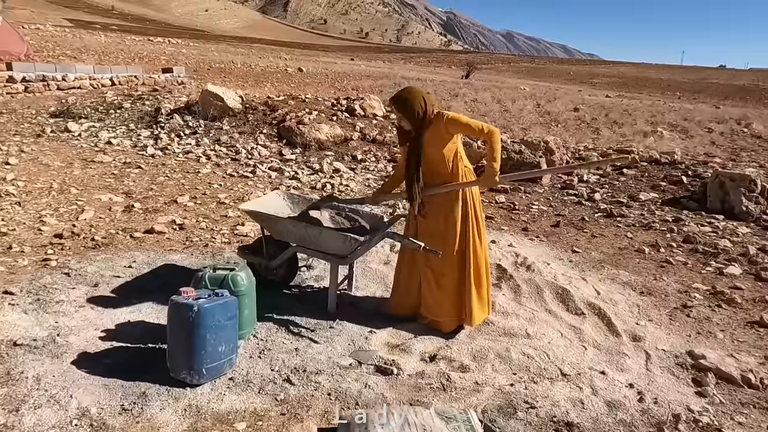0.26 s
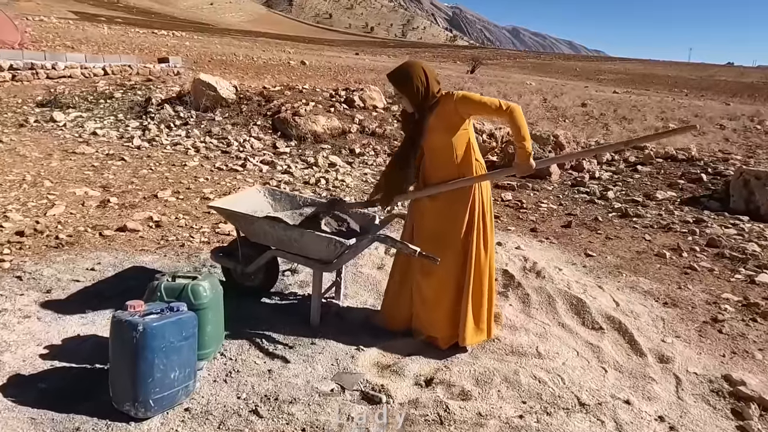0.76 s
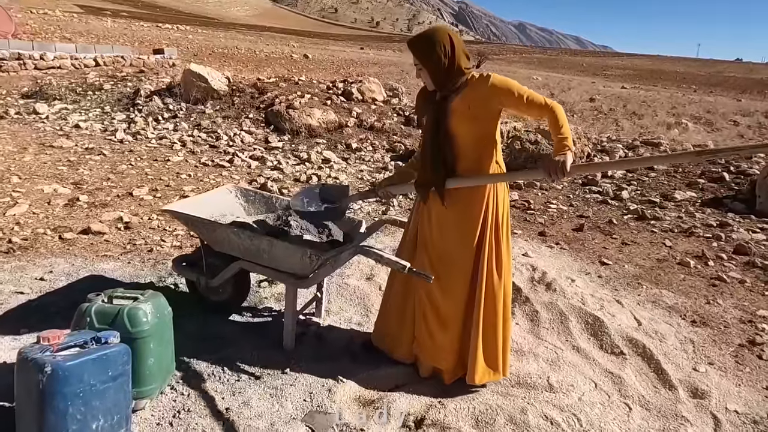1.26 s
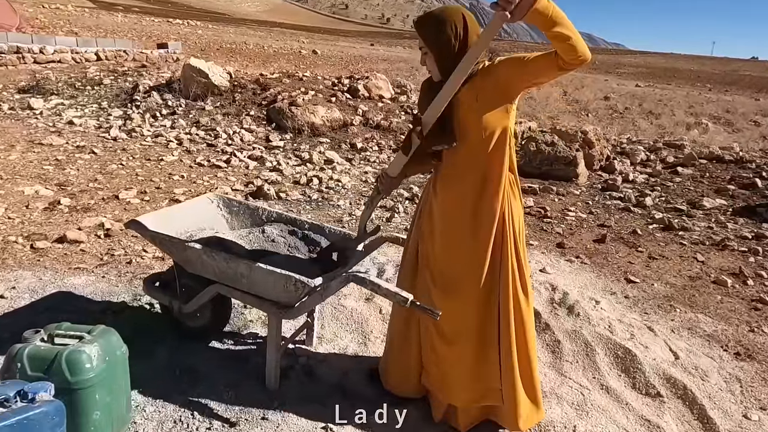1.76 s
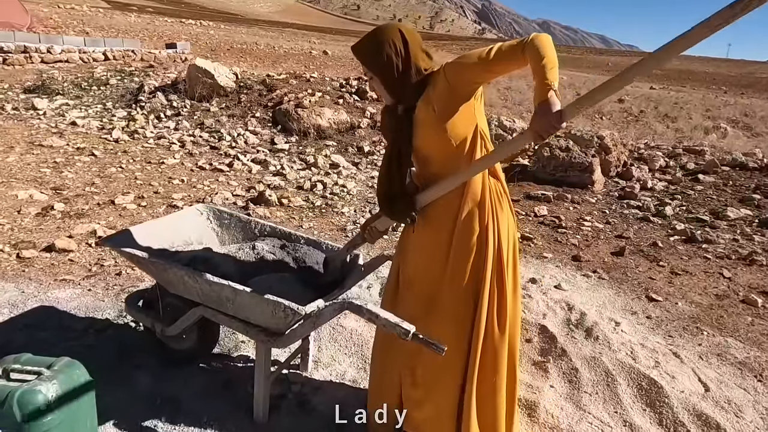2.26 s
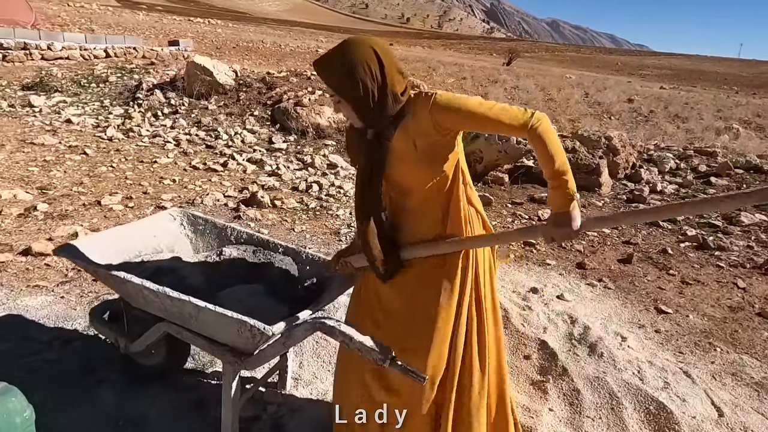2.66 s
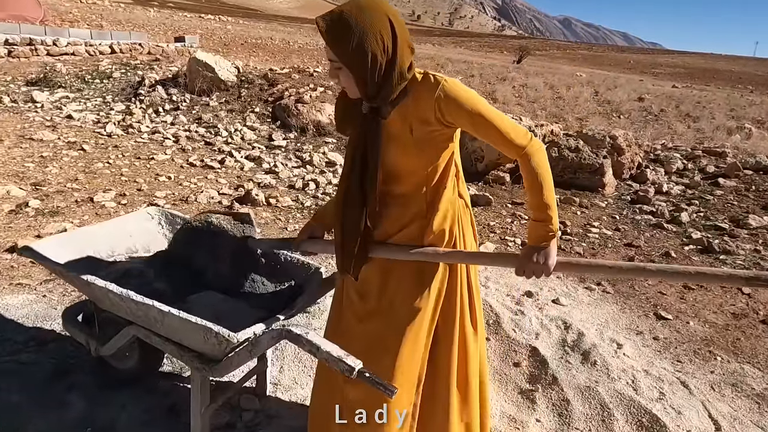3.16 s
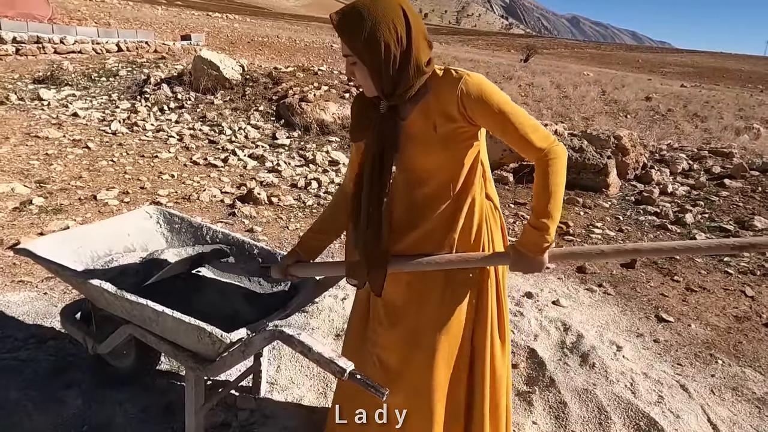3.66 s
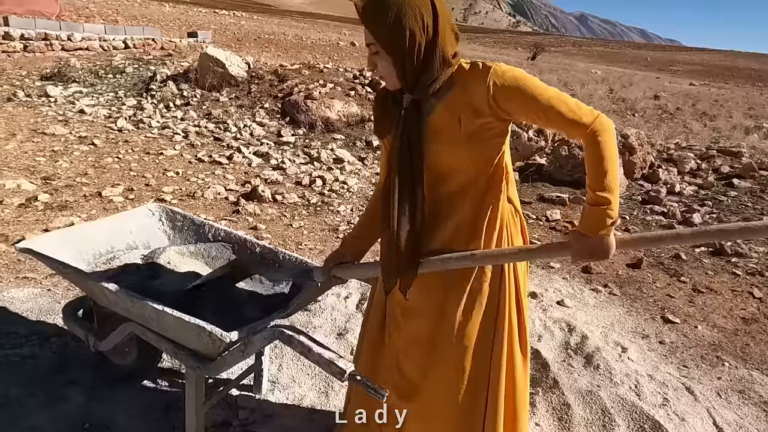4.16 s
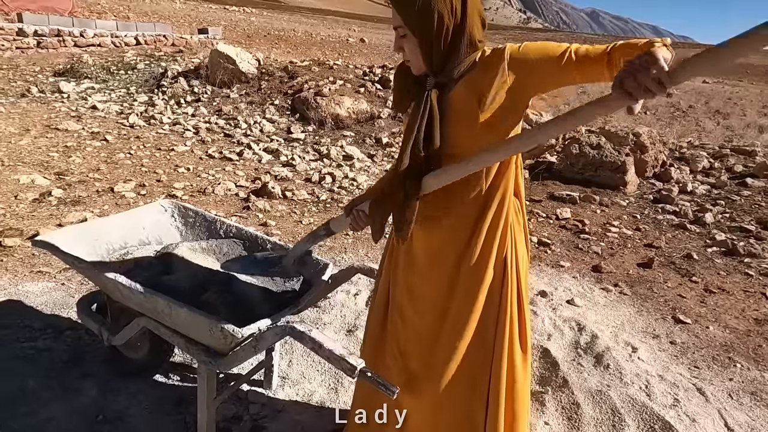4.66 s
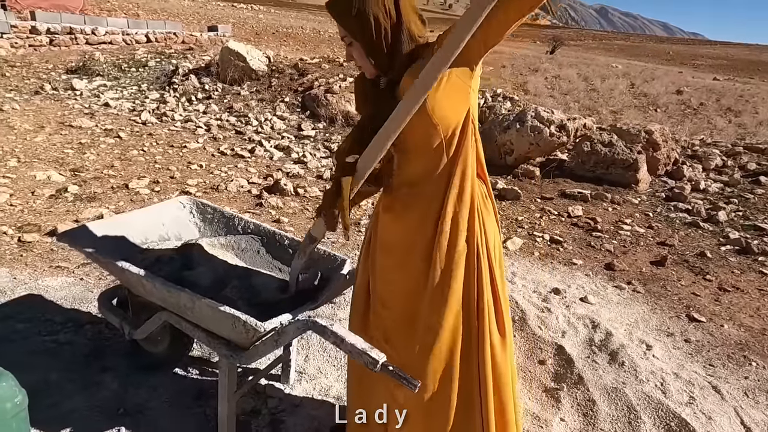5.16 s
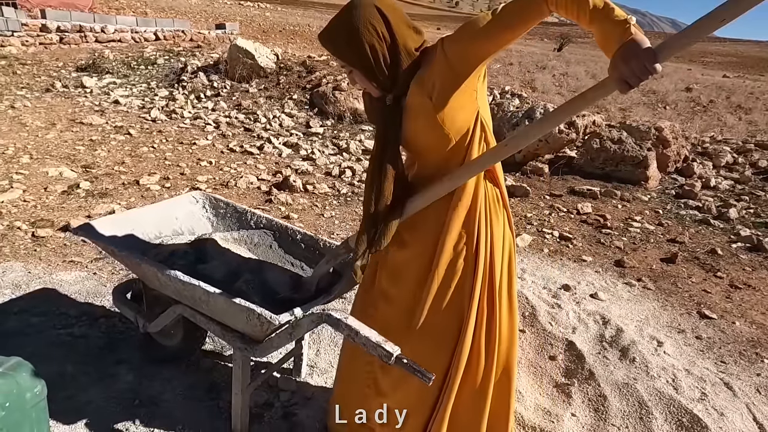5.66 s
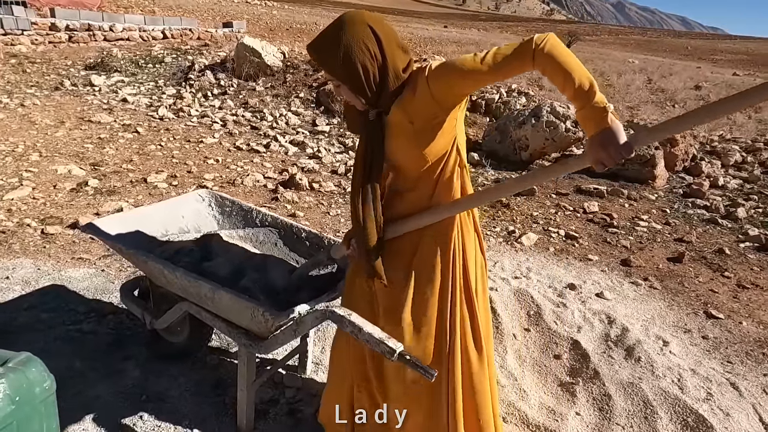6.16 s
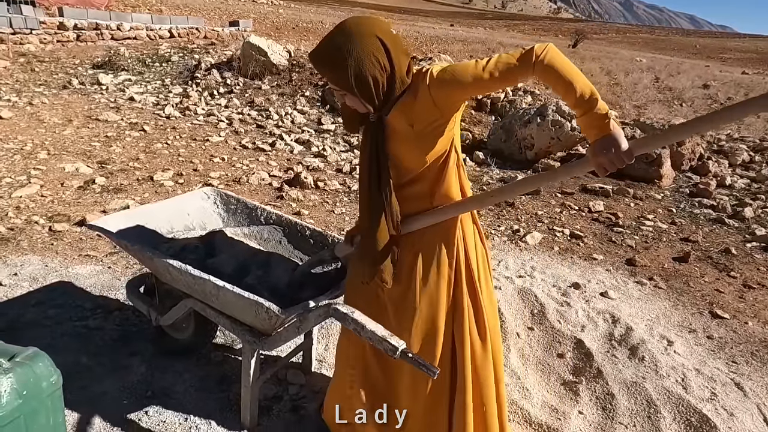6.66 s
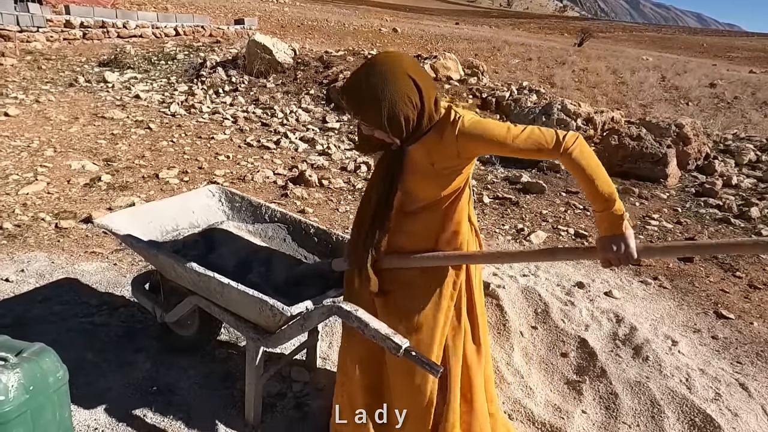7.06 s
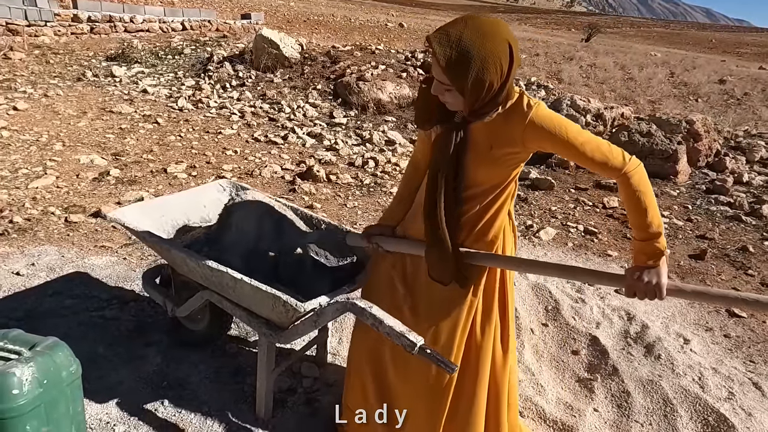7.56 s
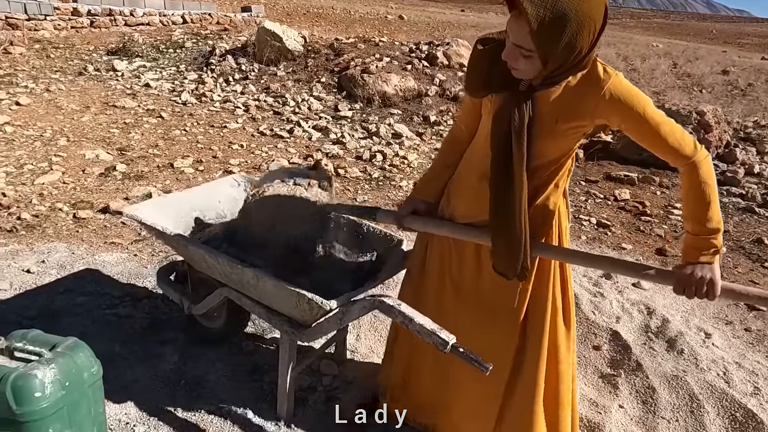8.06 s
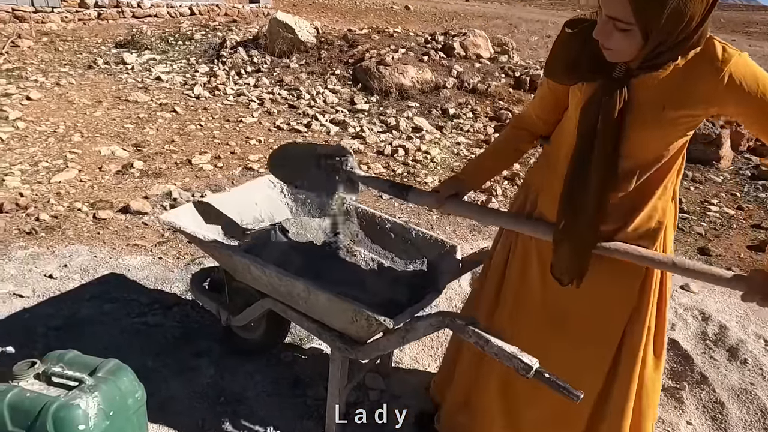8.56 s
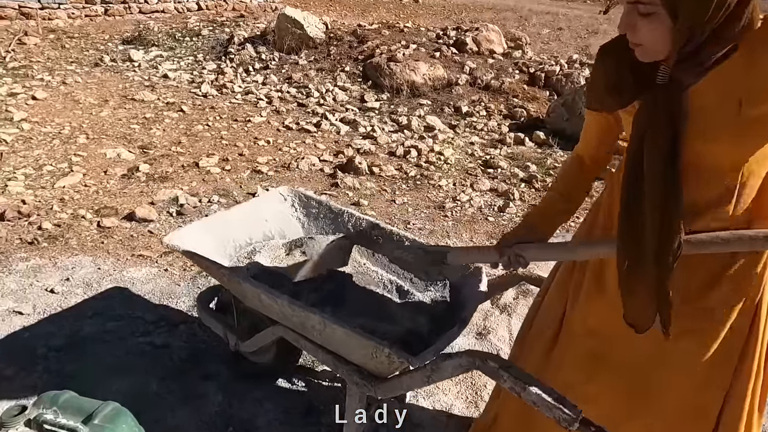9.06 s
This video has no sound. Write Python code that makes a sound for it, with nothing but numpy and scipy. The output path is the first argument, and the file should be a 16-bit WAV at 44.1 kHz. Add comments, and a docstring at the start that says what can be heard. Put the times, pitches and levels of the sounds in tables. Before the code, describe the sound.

Soft, sandy scrapes and a few low wind bumps open the scene as a nearby shovel works mix in a metal wheelbarrow. Lumps crumble, pebbles click and the blade rasps and knocks against the tray. The strokes ease off, leaving a faintly whistling breeze, then sand slides down and a stronger, crunching scrape follows. The open air is dry, with almost no echo, and an engine hums quietly far away.

```python
"""On open, stony ground, a steel shovel turns sand and cement in a steel wheelbarrow.
Sand hisses and grit crunches as sums of many tiny impacts. Pebbles tick, and the blade's edge
rasps and knocks on the tray, exciting damped modes of the steel. A breeze rushes, whistles
faintly and buffets the microphone with turbulent pressure; an engine hums far away."""
import sys
import numpy as np
from scipy import signal
from scipy.fft import rfft, irfft, next_fast_len
from scipy.io import wavfile
from scipy.ndimage import uniform_filter1d, map_coordinates

SR = 44100
rng = np.random.default_rng(int(sys.argv[2]) if len(sys.argv) > 2 else 0)


def pcm_store(signal):
    """Save signal as 16-bit PCM."""
    levels = np.round(np.clip(np.atleast_2d(signal), -1, 1) * 32767)
    wavfile.write(sys.argv[1], SR, levels.astype(np.int16).T)


N = 410571
TIME = np.arange(N) / SR


# spectrum of moving sand: f/Hz, gain/dB
SAND_SPECTRUM = [(150, -23), (540, -32), (750, -16.5), (1050, -2.5), (1450, 1.5), (1900, 4), (2300, 3.5),
                 (3200, 2), (5200, 4), (7700, -2)]
def sand(density=7500, spread_db=2.5, ring_db=-1, gain_db=1.0):
    """Sliding friction: fine grains rub the unevenly dragging blade, more in a faster stroke."""
    hiss_level = stroke_level([hiss_db for *_, hiss_db, _ in STROKES])
    flutter = from_db(1.1 * drift(200) + .9 * drift(40))
    grains_per_s = density * (0.27 + rms_one(hiss_level))
    rubbing = grains(grains_per_s, spread_db) * flutter
    hiss = colour(rubbing + from_db(ring_db) * blade(rubbing), SAND_SPECTRUM)
    return from_db(gain_db) * hiss_level * rms_one(hiss)


# strokes through the mix: start t/s, rise t/s, fall t/s, relative hiss level/dB, relative grit level/dB
STROKES = [(0.0, 0.011, 0.1, -50.5, -62), (0.057, 0.091, 0.12, -53.5, -64.5),
           (0.263, 0.087, 0.096, -49.5, -65), (0.451, 0.098, 0.1, -50.5, -61),
           (0.694, 0.1, 0.049, -51.5, -84), (0.875, 0.097, 0.17, -51, -55),
           (1.089, 0.051, 0.12, -58.5, -66.5), (1.238, 0.044, 0.24, -67, -71),
           (1.598, 0.0074, 0.055, -58.5, -61), (1.861, 0.14, 0.12, -44.5, -59.5),
           (2.19, 0.1, 0.32, -51, -54), (2.605, 0.0069, 0.29, -55.5, -54),
           (3.538, 0.06, 0.17, -47.5, -58.5), (3.755, 0.097, 0.073, -45.5, -68.5),
           (3.919, 0.16, 0.061, -43, -58.5), (4.151, 0.15, 0.08, -51, -69.5), (4.3, 0.19, 0.14, -62, -101),
           (5.01, 0.0096, 0.096, -47, -65), (5.044, 0.14, 0.094, -44.5, -69), (6.052, 0.11, 0.14, -56, -62),
           (6.715, 0.17, 0.086, -59.5, -56), (6.93, 0.057, 0.39, -71.5, -66.5),
           (8.932, 0.019, 0.05, -39, -52), (9.005, 0.0048, 0.27, -49, -66), (9.216, 0.12, 0.33, -37, -42)]
def stroke_level(peaks_db, speed_exponent=1.04, trickle_s=0.099, trickle_db=-21):
    """Power law: amplitude follows the blade's speed in each stroke; a trickle of sand lags behind."""
    power = np.zeros(N)
    for (s, rise, fall, *_), db in zip(STROKES, peaks_db):
        ramp = np.interp(TIME[:int((rise + fall) * SR)], [0, rise, rise + fall], [0, 1, 0])
        speed = np.sin(np.pi / 2 * ramp)
        add(power, s, (from_db(db) * speed ** speed_exponent) ** 2)
    moving = np.sqrt(power)
    pole = np.exp(-1 / (trickle_s * SR))
    trickle = signal.lfilter([1 - pole], [1, -pole], moving + 1e-18)
    return moving + from_db(trickle_db) * trickle


def per_stroke():
    """Sample and hold: each stroke draws a new random value, reached in 20 ms."""
    values = rng.standard_normal(len(STROKES) + 1)
    starts = sorted(s for s, *_ in STROKES)
    return uniform_filter1d(values[np.searchsorted(starts, TIME)], size=SR // 50)


# modes of the blade woken by rubbing sand: mean f/Hz, mean gain/dB
BLADE_MODES = [(2400, 1), (3140, -7.5), (3740, -2), (4790, -21), (5500, -20), (6550, -2), (7600, 4)]
def blade(x, width_hz=260, glide=0.053):
    """Mass loading: the blade's modes shift with its load of sand; each stroke favours other ones."""
    tuning = 1 + glide * (per_stroke() + .5 * drift(8))
    warped_time = np.cumsum(tuning) / SR
    out, pole = 0, np.exp(-np.pi * width_hz / SR)
    for hz, db in BLADE_MODES:
        carrier = np.exp(2j * np.pi * hz * warped_time)   # the moving centre of the resonance
        envelope = signal.lfilter([1 - pole], [1, -pole], x / carrier + 1e-18)
        mode = 2 * np.real(carrier * envelope)
        out = out + from_db(db + 2 * per_stroke()) * mode
    return out


# spectrum of cracking grit: f/Hz, gain/dB
GRIT_SPECTRUM = [(100, 0.5), (320, 4), (560, 7.5), (800, 1.5), (1400, 3.5), (2300, -0.5), (4000, -5.5),
                 (8000, -53)]
def grit(per_s=2600, spread_db=3.0, ring_db=-10, clod_db=1, pour_db=-12, gain_db=4):
    """Stick-slip friction: coarse grains crack in clumps during strokes, and also in lumps and pours."""
    digging = stroke_level([grit_db for *_, grit_db in STROKES])
    sources = [digging, from_db(clod_db) * clod_level(), from_db(pour_db) * pour_level()]
    crushing = np.linalg.norm(sources, axis=0)   # independent sources add in power
    cracks = grains(per_s, spread_db) * from_db(2 * drift(150))
    crunch = colour(cracks + from_db(ring_db) * steel(cracks), GRIT_SPECTRUM)
    return from_db(gain_db) * crushing * rms_one(crunch)


def pours(per_s=16000, spread_db=4.5, body_hz=2400, body_width_hz=900, body_db=-3):
    """Granular flow: dense impacts merge into a hiss, with a broad resonance as they land in the tray."""
    running = grains(per_s, spread_db)
    body = from_db(body_db) * resonate(running, body_hz, body_width_hz)
    return pour_level() * rms_one(colour(running + body, SAND_SPECTRUM))


# sand running off the blade: peak t/s, level/dB, swell t/s, ebb t/s
POURS = [(2.169, -51, 0.021, 0.043), (2.8, -65, 0.69, 0.57), (3.408, -49.5, 0.13, 0.095),
         (5.15, -62, 0.19, 0.12), (5.664, -60.5, 0.13, 0.098), (6.145, -42.5, 0.064, 0.04),
         (8.3, -49, 0.25, 0.26), (8.88, -64.5, 0.18, 0.13)]
def pour_level(shape=1.13):
    """Gravity flow: a pour swells as the blade tilts and ebbs as it empties (shape 1 pointed, 2 bell)."""
    return sum(from_db(db) * np.exp(-np.maximum((s - TIME) / swell, (TIME - s) / ebb) ** shape)
               for s, db, swell, ebb in POURS)


def thuds(hz=560, width_hz=750, per_s=700, spread_db=3.0, gain_db=0.5):
    """Inelastic impact: the damp core of each lump lands with a dull patter."""
    patter = resonate_twice(grains(per_s, spread_db), hz, width_hz)
    return from_db(gain_db) * clod_level() * rms_one(patter)


# lumps crushed by the blade or crumbling as they land: t/s, relative level/dB
CLODS = [(2.072, -47), (2.154, -49), (2.247, -49.5), (2.287, -53), (2.337, -45.5), (2.415, -57),
         (2.452, -50), (2.513, -54.5), (2.61, -61), (2.646, -48.5), (2.688, -54), (5.616, -60),
         (5.668, -62), (5.724, -61.5), (6.112, -52), (8.24, -51.5), (8.53, -56), (8.656, -55.5)]
def clod_level(burst_s=0.0041, crumble_s=0.03):
    """Fracture: a lump gives way quickly, then crumbles with an exponential decay."""
    out, age = np.zeros(N), TIME[:SR // 4]
    envelope = (1 - np.exp(-age / burst_s)) * np.exp(-age / crumble_s)
    for s, db in CLODS:
        add(out, s, from_db(db) * envelope)
    return out


# pebbles hitting steel: t/s, relative peak level/dB, f/Hz
PEBBLES = [(0.912, -29, 1380), (1.0707, -28.5, 3200), (1.159, -34.5, 1300), (1.687, -37.5, 1450),
           (2.095, -28, 2090), (2.646, -34, 1130), (2.653, -23.5, 1210), (2.7111, -29.5, 1340),
           (2.751, -32.5, 1250), (3.699, -30.5, 2760), (8.441, -32, 1880), (8.56, -35, 836)]
def pebbles(rattle_s=0.0011, rattle_db=-13, knock_db=6, knock_width=0.33, ring_db=-15, gain_db=-1):
    """Impact excitation: a pebble gives a crack, a spray of crumbs, a dead knock and a tray clank."""
    out, t = np.zeros(N), TIME[:SR // 20]
    for s, db, hz in PEBBLES:
        crumbs = rng.standard_normal(len(t)) * np.exp(-t / rattle_s)
        contact = (t == 0) + from_db(rattle_db) * crumbs
        crack = resonate_twice(contact, hz, 2 * hz)
        knock = resonate(crack, hz, knock_width * hz)   # sand deadens it within two cycles
        add(out, s, from_db(db + gain_db) * peak_one(crack + from_db(knock_db) * knock))
    return out + from_db(ring_db) * tray(out)


# the blade bumping the tray: t/s, peak level/dB, f/Hz
KNOCKS = [(2.366, -32, 520), (2.425, -33, 343), (2.659, -32, 316), (2.712, -35, 564), (5.242, -32, 675),
          (6.114, -39, 686)]
def knocks(width_hz=180):
    """Damped free vibration: a struck panel of the loaded tray gives one short, dull note."""
    out, tap = np.zeros(N), signal.unit_impulse(SR // 10)
    for s, db, hz in KNOCKS:
        add(out, s, from_db(db) * peak_one(resonate(tap, hz, width_hz)))
    return out


# the edge catching on the tray: start t/s, duration t/s, level/dB, rasp f/Hz, ring's share of power
CATCHES = [(0.4862, 0.005, -37, 1090, 0), (0.967, 0.054, -44.5, 1410, 0.04),
           (1.589, 0.041, -47.5, 1270, 0.01), (2.064, 0.035, -40, 2050, 0), (2.643, 0.006, -35.5, 1440, 0),
           (4.555, 0.03, -56.5, 2630, 0.05), (5.231, 0.012, -36, 1900, 0.7), (5.916, 0.097, -52, 1370, 0),
           (6.764, 0.21, -49.5, 1720, 0), (8.943, 0.01, -37.5, 5000, 0.1), (9.023, 0.061, -46.5, 1380, 0.4),
           (9.286, 0.021, -42, 2340, 0.97)]
def catches(per_s=5000, spread_db=4.5, tray_db=3):
    """Stick-slip friction: the edge judders on the tray in a hollow rasp that sets the steel ringing."""
    slips, rasp, ring_drive = grains(per_s, spread_db), np.zeros(N), np.zeros(N)
    clanking = slips + from_db(tray_db) * tray(slips)
    for start, length, db, hz, share in CATCHES:
        bite = from_db(db) * signal.windows.tukey(int(length * SR), .8)
        offset = int((start - length) * SR)
        span = slice(offset, offset + len(bite))
        hollow = resonate_twice(clanking[span], hz, width_hz=hz)
        add(rasp, start, bite * np.sqrt(1 - share) * rms_one(hollow))
        add(ring_drive, start, bite * np.sqrt(share) * rms_one(slips[span]))
    return rasp + steel(ring_drive) / np.std(steel(slips))


# modes of blade and tray, damped by the load: f/Hz, bandwidth/Hz, gain/dB
STEEL_MODES = [(2245, 56, -1), (2900, 590, -21), (3750, 170, -11), (4830, 130, -10), (7540, 680, -14)]
def steel(x):
    """Modal superposition: blade and tray ring in parallel modes of alternating sign."""
    return sum((-1) ** k * from_db(db) * resonate(x, hz, width)
               for k, (hz, width, db) in enumerate(STEEL_MODES))


# modes of the wheelbarrow's walls: f/Hz, gain/dB
TRAY_MODES = [(1120, 3), (1420, 5), (2450, -14.5)]
def tray(x, width_hz=110):
    """Plate resonance: the walls answer with a hollow clank."""
    return sum((-1) ** k * from_db(db) * resonate(x, hz, width_hz)
               for k, (hz, db) in enumerate(TRAY_MODES))


# paths by way of the tray's walls and the ground: mean delay t/ms
ECHO_DELAYS = [1.884, 3.3, 4.7]
def reflections(x, tail_s=.006, tail_db=-12.5):
    """Early reflection: echo paths shift and sway with the blade; stones scatter a faint tail."""
    out, samples = x.copy(), np.arange(N)
    for ms in ECHO_DELAYS:
        lag = (ms + .1 * per_stroke() + .04 * drift(7)) * SR / 1000
        for ear in range(2):
            ear_lag = ear * rng.integers(-4, 5)
            out[ear] -= .5 / ms * np.interp(samples - lag - ear_lag, samples, x[ear])
    t = TIME[:SR // 20]
    tail = rng.standard_normal((2, len(t))) * np.exp(-t / tail_s)
    tail /= np.linalg.norm(tail, axis=1, keepdims=True)
    return out + from_db(tail_db) * signal.fftconvolve(x, tail, axes=1)[:, :N]


def ports(x, lag_samples=0.2):
    """Path difference: sound from the right reaches the microphone's left port a moment later."""
    left = map_coordinates(x[0], [np.arange(N) - lag_samples], order=3, mode="nearest")
    return np.array([left, x[1]])


# puffs of wind: peak t/s, half-length t/s, level/dB
GUSTS = [(0.004, 0.092, -36), (0.3, 0.039, -48), (0.508, 0.033, -49.5), (0.752, 0.072, -44),
         (1.306, 0.43, -58.5), (1.897, 0.17, -54.5), (2.952, 0.041, -38.5), (3.884, 0.058, -50),
         (4.635, 0.084, -55.5), (5.595, 0.11, -50), (6.271, 0.036, -36), (7.52, 0.36, -57.5),
         (9.217, 0.025, -48)]
# spectrum of their rumble: f/Hz, gain/dB
RUMBLE_SPECTRUM = [(20, -15.5), (50, -3), (100, 9), (170, 2.5), (280, -12), (450, -22), (1000, -46)]
def wind():
    """Turbulence: lumpy pressure at the microphone ports comes in bell-shaped puffs."""
    puffs = sum(from_db(db) * np.exp(-((TIME - s) / half) ** 2) for s, half, db in GUSTS)
    lumps = from_db(5 * np.tanh(1.5 * drift(45)) + 2 * drift(130))
    return puffs * rms_one(colour(wide_noise(side_db=-8.5), RUMBLE_SPECTRUM) * lumps)


# single eddies striking the microphone: t/s, peak level/dB, f/Hz
BUFFETS = [(0.007, -31, 282), (0.048, -28, 210), (0.709, -31.5, 157), (0.766, -37.5, 133),
           (0.888, -36.5, 108), (0.905, -37.5, 236), (2.928, -32, 180), (2.946, -31.5, 170),
           (5.497, -35.5, 148), (5.549, -39.5, 500), (5.551, -25, 174), (6.168, -30.5, 228),
           (6.2784, -20, 208), (6.2963, -27.5, 388), (7.061, -44.5, 153), (7.732, -48.5, 136),
           (9.027, -44.5, 165), (9.268, -33.5, 288)]
def buffets(swell_cycles=0.233):
    """Pressure transient: an eddy's swing swells and dies within two cycles."""
    out, t = np.zeros(N), TIME[:SR // 10]
    for s, db, hz in BUFFETS:
        age = t * hz / swell_cycles
        swing = age ** 2 * np.exp(-age) * np.sin(2 * np.pi * hz * t)
        add(out, s, -from_db(db) * peak_one(swing))
    return out


# course of the breeze's rush: t/s, relative level/dB
RUSH_LEVELS = [(0, -53.5), (0.85, -54.5), (1.2, -61.5), (1.55, -63.5), (1.7, -59), (3.2, -54.5),
               (4.5, -68.5), (5.6, -66.5), (5.84, -73), (7.1, -75), (8.9, -63)]
# spectrum of the rush: f/Hz, gain/dB
RUSH_SPECTRUM = [(350, -9), (740, -14), (970, 4), (1160, -1), (1400, 4.5), (2100, -8.5), (3300, -17),
                 (8000, -39)]
# spectrum of the background air: f/Hz, gain/dB
AIR_SPECTRUM = [(20, -6), (70, 7.5), (170, -2), (330, -13.5), (1500, -21.5), (3000, -37.5), (5000, -28),
                (7700, -37)]
def breeze(waver_db=-0.5, rush_db=-1, air_db=-60.5):
    """Broadband flow noise: a hollow, wavering rush lies over the still background of open country."""
    near, far = wide_noise(side_db=-12), wide_noise(side_db=-10)
    course_db = np.interp(TIME, *np.transpose(RUSH_LEVELS))
    rush_level = from_db(course_db + rush_db + waver_db * drift(32.0))
    rush = rush_level * rms_one(colour(near, RUSH_SPECTRUM))
    return rush + from_db(air_db) * rms_one(colour(far, AIR_SPECTRUM))


def whistle(at_s=7.7, half_length_s=0.51, hz=950, width_hz=190, level_db=-68):
    """Narrow-band noise: one puff of the breeze draws a faint, airy whistle."""
    tone = resonate_twice(rng.standard_normal(N), hz, width_hz)
    return from_db(level_db) * np.exp(-((TIME - at_s) / half_length_s) ** 2) * rms_one(tone)


# harmonics of the far engine: order, mean level/dB
ENGINE_ORDERS = [(1, -60.3), (2, -67.5), (3, -71.5), (4, -81)]
def engine(firing_hz=71.4):
    """Harmonic series: only the lowest firing orders carry this far; moving air makes each waver."""
    phase = 2 * np.pi * np.cumsum(firing_hz * (1 + .005 * drift(2))) / SR
    return np.sqrt(2) * sum(from_db(db + drift(3)) * np.sin(k * phase + 2 * np.pi * rng.random())
                            for k, db in ENGINE_ORDERS)


def grains(per_s, spread_db):
    """Shot noise: random tiny impacts of uneven size, at unit power whatever their rate."""
    chance = np.clip(per_s / SR, 1e-4, 1)
    sizes = from_db(spread_db * np.minimum(rng.exponential(1, N), 4)) * rng.choice([-1, 1], N)
    return rms_one(sizes * (rng.random(N) < chance) / np.sqrt(chance))


def drift(rate):
    """Random modulation: a smooth curve changing about rate times a second."""
    knots = rng.standard_normal(N // 20)
    return map_coordinates(knots, [TIME * rate], order=2, mode="mirror")


def wide_noise(side_db):
    """Partial coherence: stereo noise, mostly common to both channels."""
    mid, side = rng.standard_normal((2, N))
    return mid + from_db(side_db) * side * np.array([[1], [-1]])


def resonate(x, hz, width_hz):
    """Second-order resonance with unit gain at its peak."""
    r = np.exp(-np.pi * width_hz / SR)
    feedback = [1, -2 * r * np.cos(2 * np.pi * hz / SR), r * r]
    return signal.lfilter(np.array([1, 0, -1]) * (1 - r * r) / 2, feedback, x + 1e-18)


def resonate_twice(x, hz, width_hz):
    """Cascade: two equal resonances give steeper skirts."""
    return resonate(resonate(x, hz, width_hz), hz, width_hz)


def colour(x, spectrum):
    """Spectral shaping by a curve through rows of f/Hz, gain/dB."""
    size = next_fast_len(N + 4096)
    hz, db = np.transpose(spectrum)
    bins = np.arange(size // 2 + 1) * SR / size
    gain = from_db(np.interp(np.log(bins + 1), np.log(hz), db))
    return irfft(rfft(x, size) * gain, size)[..., :N]


def pan(x, left_db):
    """Interaural level difference places a sound left or right."""
    return x * from_db(np.array([[left_db], [-left_db]]) / 2)


def add(track, s, sound):
    """Superposition: mix a short sound in at time s."""
    start = max(int(s * SR), 0)
    track[start:start + len(sound)] += sound[:max(N - start, 0)]


def from_db(db):
    """Decibels to amplitude ratio."""
    return 10 ** (np.asarray(db) / 20)


def rms_one(x):
    """Normalisation to unit power."""
    return x / np.sqrt(np.mean(x ** 2) + 1e-20)


def peak_one(x):
    """Normalisation to unit peak."""
    return x / np.abs(x).max()


def scene():
    """Superposition: the shovel works slightly to the right; the wind comes from that side too."""
    fine = pan(sand() + pours(), left_db=0.3)
    coarse = pan(grit() + thuds() + pebbles() + knocks() + catches(), left_db=-2.5)
    shovel = ports(reflections(fine + coarse))
    gusts = pan(wind(), left_db=-7.0) + pan(buffets(), left_db=-11.0)
    background = pan(breeze() + whistle() + engine(), left_db=-2.5)
    return shovel + gusts + background


# the microphone's treble, falling in steps: f/Hz, gain/dB
MICROPHONE_RESPONSE = [(7900, 0), (8400, -14), (10300, -20), (10900, -32), (15000, -40)]
def record(dry, hiss_db=-92.5, cutoff_hz=15700):
    """Band limiting: the microphone dulls the top octave, adds faint self-noise and cuts the very top."""
    heard = colour(dry, MICROPHONE_RESPONSE) + from_db(hiss_db) * rng.standard_normal((2, N))
    return signal.sosfilt(signal.cheby2(12, 70, cutoff_hz, fs=SR, output="sos"), heard)


dry = scene()
out = record(dry)
pcm_store(out)
```